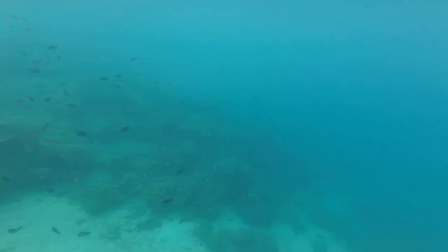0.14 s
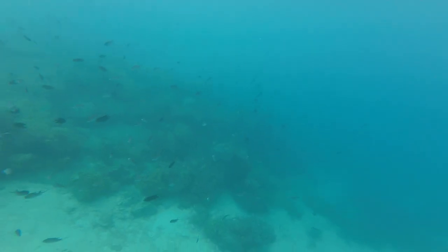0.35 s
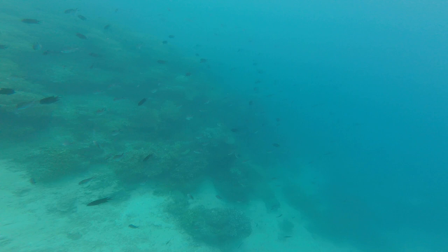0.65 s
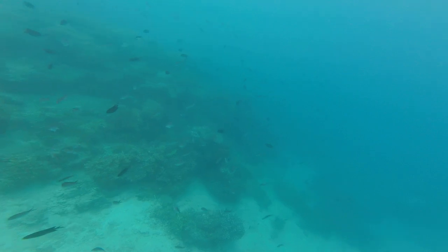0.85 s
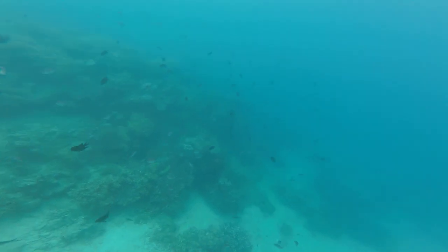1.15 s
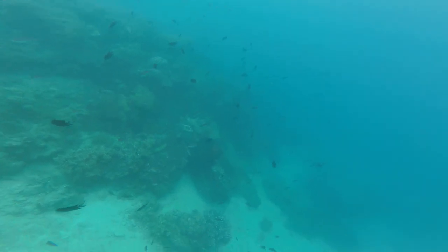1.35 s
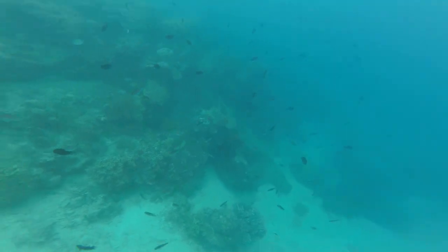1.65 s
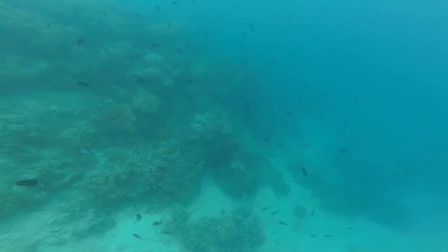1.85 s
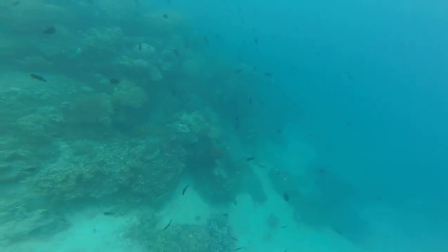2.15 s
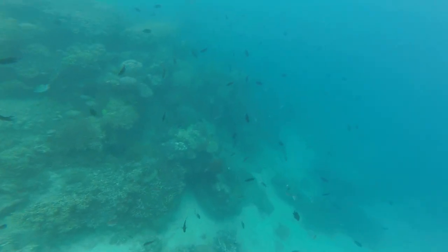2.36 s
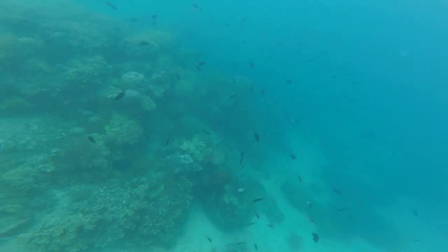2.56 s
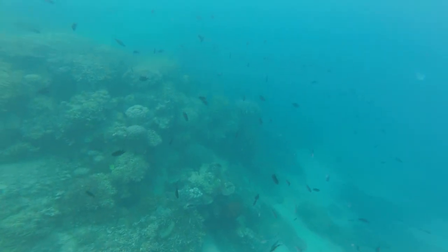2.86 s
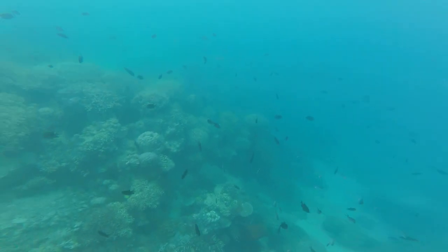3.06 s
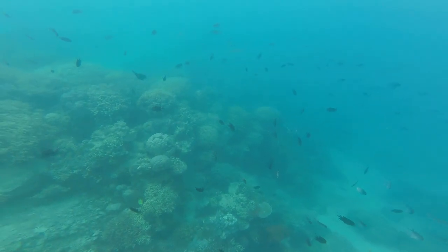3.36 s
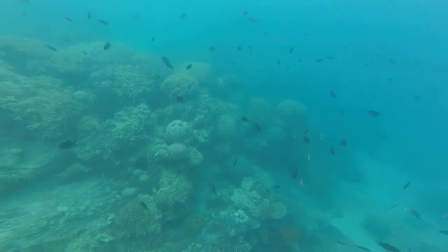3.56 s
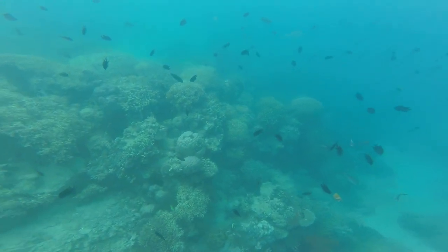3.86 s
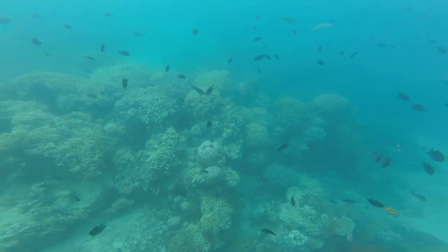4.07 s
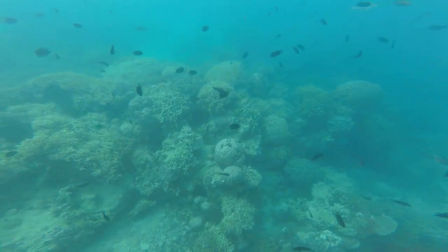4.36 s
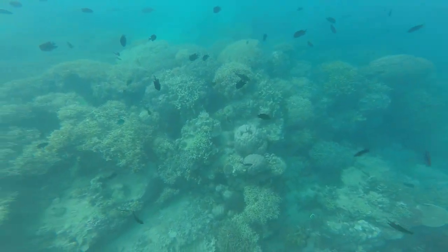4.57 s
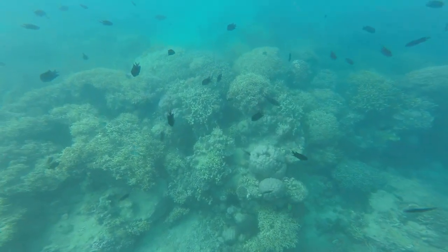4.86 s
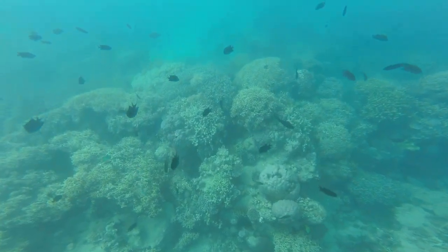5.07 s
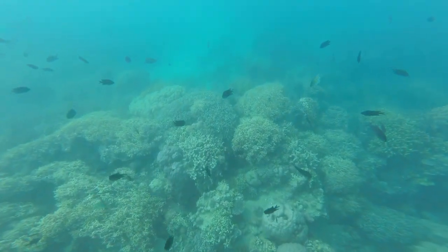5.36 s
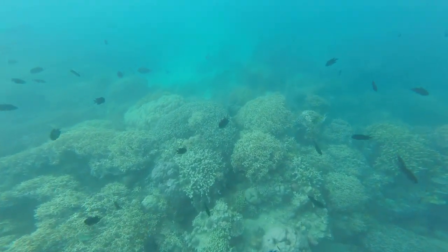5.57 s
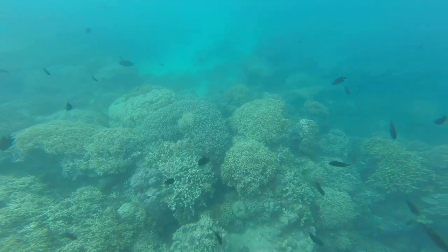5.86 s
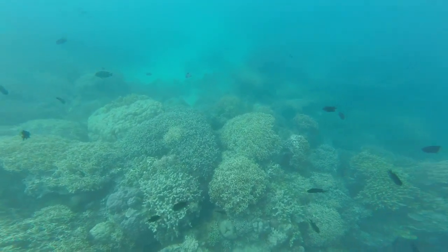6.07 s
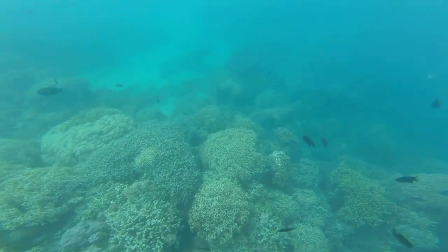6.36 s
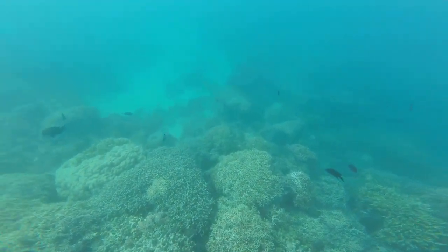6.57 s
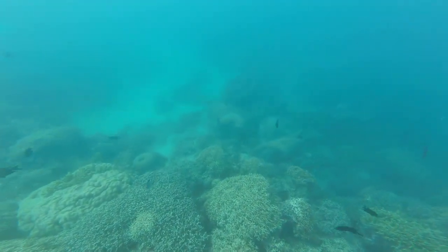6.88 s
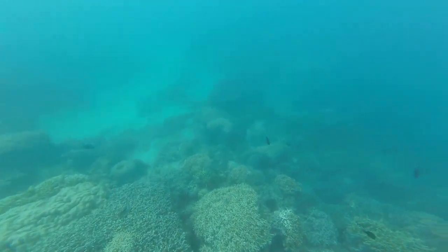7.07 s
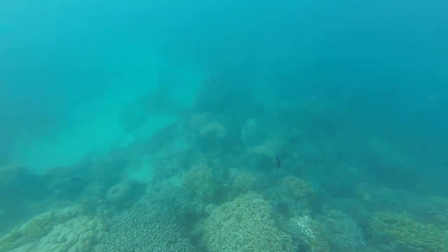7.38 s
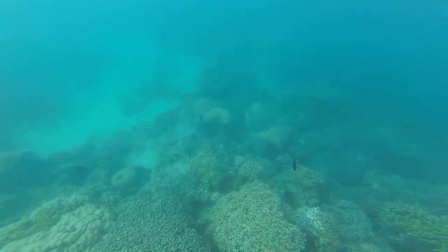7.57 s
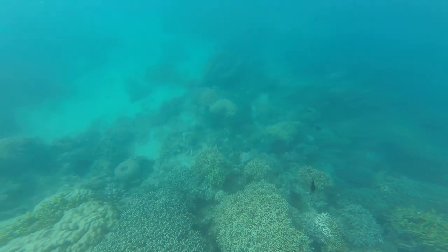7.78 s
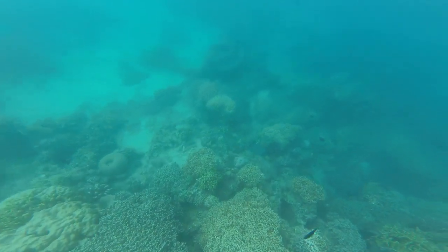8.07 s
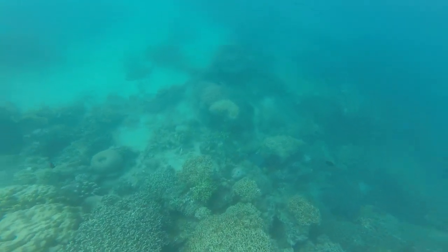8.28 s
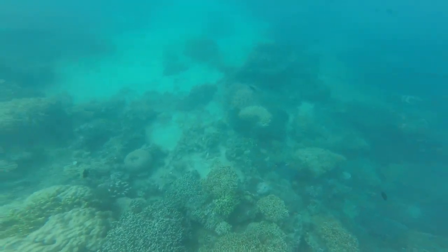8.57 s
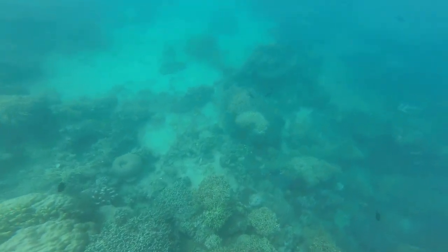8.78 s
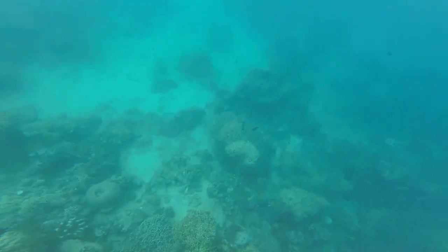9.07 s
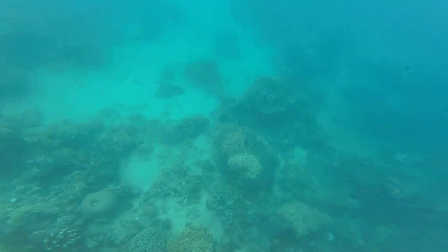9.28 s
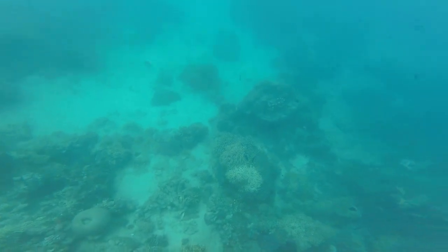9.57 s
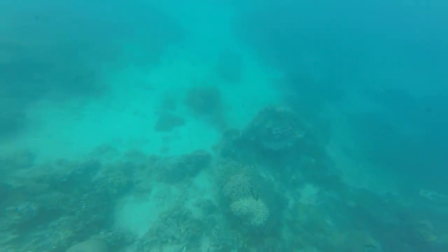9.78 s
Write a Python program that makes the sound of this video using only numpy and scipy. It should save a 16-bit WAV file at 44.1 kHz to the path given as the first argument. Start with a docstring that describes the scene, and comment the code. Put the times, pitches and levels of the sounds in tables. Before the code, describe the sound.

A muffled chugging engine, about twelve cycles a second, rattles through the sea as rushing water buffets the microphone and faint reef clicks snap.

```python
"""A boat engine runs slowly nearby, heard under water from inside a sealed housing moving over a reef.
Its hum is multiples of the cycle rate; knocks, clatter, ticks, ringing and fizz are noise bursts and
short tones, some in step with the cycle, some at random or listed times. The flow buffets the housing:
coloured noise in gusts over a rumble, with low thuds. Sharp clicks, some perhaps from snapping reef
animals, are sums of decaying tones, most ringing the housing, a few short and dry."""
import sys
import numpy as np
from scipy import signal
from scipy.fft import rfft, irfft, next_fast_len
from scipy.io import wavfile
from scipy.ndimage import uniform_filter1d, minimum_filter1d

SR = 44100
rng = np.random.default_rng(int(sys.argv[2]) if len(sys.argv) > 2 else 0)


def bounce(signal):
    """Save signal as a 16-bit WAV file at the path given by the first command-line argument."""
    frames = np.transpose(np.atleast_2d(signal))
    limited = np.clip(frames, -1, 1)
    pcm = np.round(limited * 32767).astype(np.int16)
    wavfile.write(sys.argv[1], SR, pcm)


N = 437913
T = np.arange(N) / SR

# engine at the housing, before trims: t/s, knocking level/dB, clatter level/dB, ringing level/dB
ENGINE_LEVELS = [(0.05, -31.5, -40, -54.5), (0.76, -29.5, -37, -47.5), (1.5, -25.5, -31.5, -42),
                 (1.72, -24.5, -28, -42), (1.96, -20, -28, -38), (2.5, -22.5, -31.5, -42),
                 (3.35, -21.5, -31, -41), (3.65, -23, -33.5, -43), (4.01, -22, -30, -40.5),
                 (4.36, -18.5, -26.5, -38.5), (4.61, -23, -27, -40), (5.07, -19.5, -30, -39),
                 (5.25, -26.5, -31.5, -40), (5.75, -20, -29, -38), (6.03, -25, -31, -39.5),
                 (6.33, -22, -30.5, -41), (6.98, -25, -31.5, -39.5), (7.8, -20, -35.5, -41),
                 (7.99, -36, -38.5, -41), (8.78, -28.5, -36.5, -43.5), (9.16, -36, -41.5, -48.5),
                 (9.85, -30.5, -38.5, -47.5)]
# engine fizz, also steers the faint crackle: t/s, level/dB
FIZZ_LEVELS = [(0.1, -77.5), (1.38, -64.5), (2.0, -63), (3.9, -67), (4.3, -63.5), (6.4, -63.5), (7.46, -63),
               (8.0, -64.5), (8.82, -70.5), (9.19, -78.5), (9.85, -78)]


def amp(db):
    """Amplitude ratio of a level in dB."""
    return 10 ** (np.asarray(db) / 20)


def evened(x):
    """Scale to rms 1."""
    return x / np.sqrt(np.mean(x ** 2) + 1e-20)


def curve(rows, column, t=T):
    """One column of a time table, linear between rows."""
    table = np.array(rows)
    return np.interp(t, table[:, 0], table[:, column])


def read(points, hz):
    """Spectrum level, linear in dB over log frequency, -120 dB outside the points."""
    f, db = np.transpose(points)
    return np.interp(np.log(hz + 1), np.log(f + 1), db, -120, -120)


def coloured(x, points):
    """Filter by a spectrum of f/Hz, level/dB, then scale to rms 1."""
    size = next_fast_len(N)
    gain = amp(read(points, np.fft.rfftfreq(size, 1 / SR)))
    return evened(irfft(rfft(x, size) * gain, size)[:N])


def wander(seconds):
    """Smooth chance of rms 1 that changes over the given time."""
    t = np.arange(0, N / SR + 1, seconds / 8)
    steps = rng.standard_normal(len(t))
    smooth = uniform_filter1d(uniform_filter1d(steps, 8), 8)
    return np.interp(T, t, evened(smooth))


def add(mix, s, sound):
    """Mix a sound in at s seconds, cut at the end."""
    part = mix[round(s * SR):][:len(sound)]
    part += sound[:len(part)]


def rattle(turns, blows, points, level_db, flicker_db, flicker_s):
    """Noise that bursts at fixed places of the cycle, each blow with its own strength."""
    luck = np.clip(rng.standard_normal((130, len(blows))), -2, 1.3)
    coarse = turns[::16]
    power = 1  # steady part
    for (place, length, db, scatter_db), row in zip(blows, luck.T):
        nearest = np.round(coarse - place)
        strength = amp(db + scatter_db * row[nearest.astype(int) + 2]) ** 2
        power = power + strength * np.exp(-((coarse - place - nearest) / length) ** 2)
    swell = np.interp(turns, coarse, np.sqrt(power))
    swell *= amp(flicker_db * wander(flicker_s))
    return amp(level_db) * coloured(swell * rng.standard_normal(N), points)


def bursts(rows, cycles, glide, lead_s, db, order=2):
    """Short tones that swell, die and glide, peaking after `cycles`; a higher order narrows the swell."""
    out = np.zeros(N)
    for (s, peak_db, hz), phase in zip(rows, rng.random(len(rows))):
        u = np.arange(0, 7 * cycles, hz / SR) / cycles  # 1 at the peak
        swell = (u * np.exp(1 - u)) ** order
        tone = swell * np.sin(2 * np.pi * (cycles * u * (1 + glide * (u - 1)) + phase))
        add(out, max(s - lead_s, 0), amp(peak_db + db) * tone)
    return out


def scattered(per_s, pair_hz, column, spread, over_db):
    """Random short rings near two pitches, following an engine level: t/s, level/dB, f/Hz."""
    when, size, which, detune = rng.random((int(per_s * N / SR), 4)).T
    s = when * (N / SR - .05)
    hz = np.where(which < .6, *pair_hz) * (1 + spread * (detune - .5))
    return np.transpose([s, curve(ENGINE_LEVELS, column, s) + over_db + 4.8 * size, hz])


def beneath(steady, hits, depth):
    """A struck part rings with the blow alone: its steady sound gives way while the blow lasts."""
    hit_power = uniform_filter1d(hits ** 2, 200)
    steady_power = uniform_filter1d(steady ** 2, 4000) + 1e-12
    return steady / (1 + depth * abs(hit_power / steady_power)) + hits


def engine_turns():
    """Engine cycles gone by at each sample; the slope is the cycle rate."""
    # t/s, cycles gone by
    cycle_times = [(0, -0.52), (0.8766, 10), (1.7037, 20), (2.5441, 30), (3.3828, 40), (3.7944, 45),
                   (4.6056, 55), (5.4367, 65), (6.2633, 75), (6.6742, 80), (7.5134, 90), (8.339, 100),
                   (9.1383, 110), (9.94, 120.13)]
    return curve(cycle_times, 1)


def hum(turns):
    """Low multiples of the cycle rate, in step with one pressure pulse a cycle, each wavering a little."""
    # multiple of the cycle rate, relative level/dB
    partials = [(2, -13), (3, -9), (4, 0), (5, -13), (6, -16), (7, -13)]
    # t/s, level/dB
    levels = [(0.1, -30.5), (0.37, -56), (1.19, -28), (1.4, -40), (1.87, -22.5), (3.4, -23), (3.6, -28),
              (4.38, -28), (5.94, -25.5), (6.1, -29), (7.06, -24.5), (7.71, -23.5), (8.21, -37),
              (9.15, -25.5), (9.41, -43), (9.9, -22)]
    drift_cycles = 0.035 * wander(0.22)  # the path through the water shifts
    tones = np.zeros(N)
    for k, db in partials:
        waver_db = 1.5 * wander(.25)
        tones += amp(db + waver_db) * np.cos(2 * np.pi * k * (turns - .1 + drift_cycles))
    return amp(curve(levels, 1)) * np.sqrt(2) * tones


def knocking(turns):
    """Mid-pitched noise blows in each cycle and random soft knocks, giving way to the loudest knocks."""
    # place in cycle (0-1), length/cycles, level over steady/dB, scatter/dB
    blows = [(0.079, 0.09, 7, 1.8), (0.279, 0.06, 5, 1.8), (0.621, 0.04, 0, 1.8), (.85, 0.08, 6.5, 1.8)]
    # f/Hz, relative density/dB per Hz
    spectrum = [(330, -19.5), (450, -4), (560, -3), (640, 2), (800, -0.5), (900, -1.5), (990, -6.5),
                (1100, -10.5), (1400, -43)]
    # loudest knocks: t/s (starts lead_s earlier), relative peak/dB, f/Hz
    thumps = [(.033, -19.5, 880), (.04, -21.5, 536), (.055, -19, 900), (.184, -22.5, 430),
              (0.485, -19.5, 462), (.532, -22, 820), (.717, -18.5, 774), (0.972, -22, 785),
              (1.047, -21, 665), (1.09, -16.5, 784), (1.18, -17, 745), (1.412, -17, 790),
              (1.592, -13.5, 750), (1.703, -19, 800), (1.749, -13.5, 704), (1.79, -13, 770),
              (1.822, -12, 810), (1.876, -19, 620), (1.927, -18, 676), (1.98, -10, 940), (2.013, -18, 780),
              (2.035, -19, 810), (2.056, -22, 715), (2.085, -14, 740), (2.178, -9, 617), (2.362, -10, 776),
              (2.422, -22, 608), (2.52, -14, 690), (2.693, -15, 780), (2.929, -17, 656), (2.946, -8.5, 730),
              (2.984, -10.5, 890), (3.025, -12, 830), (3.054, -10.5, 687), (3.08, -16, 750),
              (3.111, -16, 750), (3.14, -16, 850), (3.217, -21, 623), (3.287, -10.5, 845),
              (3.322, -15, 740), (3.371, -12, 830), (3.452, -13, 790), (3.531, -10.5, 740),
              (3.698, -16, 780), (3.782, -14, 790), (3.816, -12, 770), (3.862, -11, 710), (3.9, -11, 760),
              (3.943, -15, 770), (3.976, -8.5, 700), (4.022, -12, 736), (4.062, -12, 750),
              (4.123, -13, 700), (4.146, -12, 786), (4.187, -12, 790), (4.217, -20, 700),
              (4.268, -9.5, 705), (4.285, -13, 683), (4.302, -8, 690), (4.312, -13, 527),
              (4.348, -5.5, 686), (4.385, -19, 774), (4.415, -19, 770), (4.425, -17, 785), (4.436, -9, 727),
              (4.447, -12, 690), (4.462, -19, 835), (4.508, -5.5, 693), (4.536, -11, 740), (4.58, -14, 700),
              (4.617, -9.5, 415), (4.667, -18, 810), (4.691, -22, 810), (4.759, -14, 830),
              (4.796, -15, 770), (4.839, -9.5, 786), (4.875, -6, 720), (4.921, -11.5, 780),
              (4.953, -8.5, 764), (5.003, -9.5, 747), (5.085, -13, 552), (5.119, -7, 710), (5.27, -19, 573),
              (5.326, -21, 613), (5.418, -13.5, 770), (5.49, -10, 790), (5.583, -9.5, 667),
              (5.651, -11, 610), (5.671, -8.5, 766), (5.741, -8.5, 603), (5.752, -14, 794),
              (5.857, -11, 770), (5.911, -13.5, 607), (6.083, -8.5, 770), (6.147, -19, 900),
              (6.167, -12, 588), (6.204, -12, 840), (6.232, -15, 786), (6.248, -11, 696),
              (6.334, -12.5, 796), (6.365, -16, 656), (6.401, -10, 740), (6.494, -9, 745),
              (6.565, -13, 620), (6.721, -10.5, 608), (6.757, -13, 740), (6.929, -24, 600),
              (7.182, -22, 880), (7.41, -13.5, 650), (7.433, -17, 646), (7.493, -6, 617), (7.52, -15, 687),
              (7.564, -19, 664), (7.579, -9.5, 614), (7.596, -7, 663), (7.658, -9.5, 640),
              (7.72, -13.5, 426), (7.74, -10.5, 670), (7.762, -8.5, 700), (7.778, -12.5, 770),
              (8.057, -13.5, 794), (8.164, -19, 560), (8.296, -14, 640), (8.427, -18, 580),
              (8.636, -20, 595), (8.706, -21, 776), (8.778, -23, 567), (8.945, -25, 703),
              (9.227, -18.5, 921), (9.325, -20, 846), (9.43, -24, 830), (9.654, -18, 710),
              (9.855, -22, 760)]
    level_db = curve(ENGINE_LEVELS, 1) - 4.0
    steady = rattle(turns, blows, spectrum, level_db, flicker_db=0.56, flicker_s=0.0073)
    soft_rows = scattered(per_s=45, pair_hz=[770, 632], column=1, spread=0.45, over_db=-4.0)
    soft = bursts(soft_rows, cycles=3.36, glide=0.03, lead_s=0, db=0.5)
    loud = bursts(thumps, cycles=3.72, glide=0.054, lead_s=0.00422, db=-2.0, order=5)
    return beneath(steady + soft, loud, depth=0.87)


def clattering(turns):
    """Noise blows in each cycle and small parts ringing at random, giving way to the loudest pings."""
    # place in cycle (0-1), length/cycles, level over steady/dB, scatter/dB
    blows = [(.03, 0.063, 2.4, 4.7), (0.549, 0.051, 1.2, 5.6), (0.849, 0.22, 1.9, 2.1)]
    # f/Hz, relative density/dB per Hz
    spectrum = [(620, -39), (1050, 1), (1180, -5), (1420, 0), (1490, 0), (1600, -5.5), (1770, 1),
                (1960, -11), (2200, -14), (2860, -36), (4840, -120)]
    # loudest pings: t/s (starts lead_s earlier), relative peak/dB, f/Hz
    pops = [(.0997, -15, 1520), (.1242, -17, 1570), (.207, -17, 1710), (.2828, -13.5, 1500),
            (.3287, -27, 1520), (.3726, -17, 1540), (0.4589, -11, 1480), (.5083, -14, 1500),
            (0.588, -11, 1500), (0.622, -12, 1520), (.6634, -17, 1980), (0.6784, -6.5, 1430),
            (0.709, -9, 1520), (0.7911, -10.5, 1560), (0.8809, -8, 1480), (0.9063, -12, 1490),
            (.9613, -18, 1620), (1.015, -9.5, 1480), (1.04, -8, 1760), (1.0725, -13, 1500),
            (1.13, -11.5, 1570), (1.1713, -15, 1800), (1.2441, -18, 1580), (1.2845, -13, 1820),
            (1.545, -6, 1520), (1.623, -10, 1450), (1.651, -10, 1520), (1.708, -9, 1890), (1.776, -7, 2060),
            (1.795, -16, 1650), (1.8761, -4, 1660), (1.91, -13, 1480), (1.943, -4, 1750),
            (1.9824, -6, 1500), (2.04, -8, 1830), (2.077, -13, 1433), (2.105, -13, 1792), (2.164, -5, 1500),
            (2.395, -9, 2000), (2.444, -10, 1760), (2.4458, -1, 1460), (2.453, -5, 1530), (2.467, -7, 1520),
            (2.63, -6, 1500), (2.6673, -2, 1420), (2.669, -5, 1830), (2.675, -9, 1500), (2.802, -20, 1410),
            (2.9203, -10, 1450), (2.947, -5, 1440), (3.1966, -7.5, 1400), (3.27, -5, 1410),
            (3.3802, -6, 1430), (3.433, -9, 1370), (3.667, -8, 1370), (3.92, -5, 1390),
            (4.0008, -6.5, 1350), (4.076, -6, 1360), (4.204, -11, 1433), (4.238, -7, 1300),
            (4.422, -6, 1350), (4.447, -7, 1720), (4.485, -8, 1340), (4.567, -4, 1380), (4.769, -7, 1730),
            (4.79, -14, 1488), (4.795, -6, 1740), (4.9227, -4.5, 1730), (5.226, -9, 1800),
            (5.3547, -5, 1410), (5.423, -6, 1770), (5.43, -5.5, 1340), (5.669, -10, 1709),
            (5.748, -6, 1390), (6.034, -7, 1800), (6.1404, -6, 1390), (6.338, -10, 1420),
            (6.389, -11, 1370), (6.412, -6, 1440), (6.807, -8, 1510), (6.9062, -7, 1660),
            (7.149, -11, 1470), (7.174, -7, 1510), (7.303, -7, 1480), (7.325, -5, 1480), (7.45, -4.5, 1460),
            (7.5078, -10, 1830), (8.0805, -15, 1560), (8.1972, -12, 1600), (8.2546, -10, 1530),
            (8.3459, -10, 1530), (8.7091, -14, 1460), (8.8094, -13, 2140), (9.1473, -22, 2000),
            (9.2509, -15, 1840), (9.3247, -11, 1780), (9.4117, -19, 1870), (9.5614, -17, 1950),
            (9.61, -16.5, 1410), (9.6871, -18, 1470), (9.7647, -11, 1450), (9.8223, -20, 1510),
            (9.8697, -20, 1830)]
    level_db = curve(ENGINE_LEVELS, 2) - 1.6
    steady = rattle(turns, blows, spectrum, level_db, flicker_db=0.5, flicker_s=0.0075)
    ping_rows = scattered(per_s=190, pair_hz=[1445.5, 1760], column=2, spread=0.21, over_db=-6.0)
    pings = bursts(ping_rows, cycles=6.3, glide=0.0094, lead_s=0, db=0.5)
    loud = bursts(pops, cycles=5.7, glide=0.0051, lead_s=0.0026, db=-13.0, order=3)
    return beneath(steady + pings, loud, depth=0.38)


def ticks(turns):
    """Valve ticks: a short metal ring at the same places of every cycle."""
    # place in cycle, level over the ringing/dB
    places = [(-.02, 18), (0.499, -5.5), (.88, 0.5)]
    t, t60_s = np.arange(1200) / SR, 0.0076
    ring = np.zeros(len(t))
    for hz, db in [(2600, -1.0), (3280, -6.0)]:
        ring += np.sin(2 * np.pi * hz * t) * amp(db - 60 * t / t60_s)
    ring *= (1 - np.exp(-t / 0.00093)) ** 2  # the housing softens the start
    strikes = np.zeros(N)
    for place, db in places:
        at = np.flatnonzero(np.diff(np.floor(turns - place)))
        strikes[at] += amp(db + 2.5 * rng.standard_normal(len(at)))
    return signal.oaconvolve(strikes * amp(curve(ENGINE_LEVELS, 3)), ring)[:N]


def ringing(turns):
    """Ringing band of noise, swelling with blows in each cycle."""
    # place in cycle (0-1), length/cycles, level over steady/dB, scatter/dB
    blows = [(.15, 0.067, 3.5, 2), (0.529, 0.016, 3.2, 2.7), (.87, 0.08, 3.2, 0.86)]
    # f/Hz, relative density/dB per Hz
    spectrum = [(1210, -17.5), (2050, 0), (2540, -5.5), (2850, -17), (3260, -17.5), (3560, -24.5),
                (3800, -40.5), (4500, -68.5), (7170, -120)]
    level_db = curve(ENGINE_LEVELS, 3) + 1.86
    return rattle(turns, blows, spectrum, level_db, flicker_db=2.0, flicker_s=0.003)


def fizzing(turns):
    """Faint treble noise, swelling with brief blows in each cycle."""
    # place in cycle (0-1), length/cycles, level over steady/dB, scatter/dB
    blows = [(.02, 0.024, 1.5, 3), (.52, 0.026, 1.9, 1.8), (.82, 0.046, 1.8, 3.4)]
    # f/Hz, relative density/dB per Hz
    spectrum = [(3300, -41.5), (3700, -6), (5000, -6.5), (5900, -8.5), (6250, -7), (6470, 3.5),
                (6800, -3.5), (7500, -5.5), (9300, -15), (10100, -29), (12000, -31), (13000, -63.5)]
    return rattle(turns, blows, spectrum, curve(FIZZ_LEVELS, 1), flicker_db=1.0, flicker_s=0.0086)


def gusts():
    """Flow rows t/s, level/dB, brightness/dB per octave: each gust rises quickly, holds and fades."""
    # flow between gusts: t/s, level/dB
    calm = [(0.1, -32.5), (0.5, -29.5), (0.75, -35), (1.3, -28), (2.4, -27), (3.9, -31.5), (4.4, -25.5),
            (5.8, -29.5), (7.3, -30.5), (7.8, -25), (9.9, -25)]
    # start/s, hold/s, level/dB, brightness/dB per octave
    gust_rows = [(0.015, 0.022, -30.5, 4), (1.627, 0.15, -27, -5.5), (1.992, 0.068, -21, 0),
                 (2.133, 0.045, -24.5, 10.5), (2.644, 0.2, -21, 0.5), (2.984, 0.048, -23, 2.5),
                 (3.414, 0.046, -21.5, 2.5), (3.574, 0.039, -25.5, -5), (4.09, 0.014, -29.5, 6),
                 (4.597, 0.019, -24.5, 0.5), (5.13, 0.27, -19.5, 0.5), (5.928, 0.13, -20, 0.5),
                 (6.126, 0.042, -21, 4.5), (6.302, 0.19, -19.5, -1), (6.785, 0.22, -25, -0.5),
                 (7.533, 0.057, -32.5, 2), (7.861, 0.14, -18, 0.5), (7.997, 0.41, -17.5, 2.4),
                 (8.496, 0.34, -20, -2), (8.87, 0.36, -18.5, -1), (9.361, 0.047, -24.5, -4.5),
                 (9.493, .02, -24.5, -10), (9.606, .03, -26, -11.5), (9.766, .04, -21, -4)]
    rise_s, fade_db_per_s = 0.0074, 84.5
    t = np.arange(0, N / SR, .002)
    power = amp(curve(calm, 1, t)) ** 2
    tilt = 0  # weighted by power
    for s, hold_s, db, tilt_db in gust_rows:
        fade_db = fade_db_per_s * np.maximum(t - s - rise_s - hold_s, 0)
        gust = (np.clip((t - s) / rise_s, 0, 1) * amp(db - fade_db)) ** 2
        power = power + gust
        tilt = tilt + gust * tilt_db
    return np.transpose([t, 10 * np.log10(power), tilt / power])


def flow():
    """Lumpy turbulence in gusts, each with its own brightness, over a deep rumble."""
    # buffeting: f/Hz, relative density/dB per Hz
    buffet = [(53, -31), (90, 0), (146, 1.5), (322, -3), (629, -11), (688, -17.5), (786, -10.5), (909, -20),
              (1300, -29.5), (1690, -61), (2860, -120)]
    # deep push of the water: t/s, level/dB before its waver
    rumble_levels = [(0.1, -30.5), (1.3, -23), (1.7, -22), (2.25, -31), (2.79, -21), (3.1, -22.5),
                     (3.49, -22.5), (3.9, -27.5), (4.7, -24), (5.3, -29), (5.45, -20), (5.65, -28),
                     (5.85, -25), (6.7, -27), (7.1, -26), (7.67, -23.5), (8.65, -18.5), (8.8, -25),
                     (9.03, -19), (9.3, -27.5), (9.85, -29)]
    # f/Hz, relative density/dB per Hz
    rumble_spectrum = [(10, -36), (24, -3), (40, -5), (70, -4), (100, -9), (140, -15.5), (300, -84)]
    hop, frames = 256, N // 256 + 5
    hz = np.fft.rfftfreq(1024, 1 / SR)
    real, imag, patches = rng.standard_normal((frames, 513, 3)).T
    # patches of strength, smooth over 8 bins and 6 frames
    patches = evened(uniform_filter1d(uniform_filter1d(patches, 8, 0), 6, 1))
    push = gusts()
    octaves = np.log2(np.maximum(hz, 20) / 220)[:, None]
    tilt_db = np.clip(curve(push, 2, np.arange(frames) * hop / SR) * octaves, -30, 12)
    grid = (real + 1j * imag) * amp(1.13 * patches + tilt_db)
    lumps = signal.istft(grid, nperseg=1024, noverlap=1024 - hop)[1][:N]
    lumps = lumps * amp(1.5 * wander(.015))
    rumble_db = curve(rumble_levels, 1) + 1.5 * wander(.1)
    rumble = amp(rumble_db) * coloured(rng.standard_normal(N), rumble_spectrum)
    return amp(curve(push, 1)) * coloured(lumps, buffet) + rumble


def water():
    """The flow, giving way to the loudest lumps of water hitting the housing."""
    # t/s (starts lead_s earlier), relative peak/dB, f/Hz
    thuds = [(.072, -11, 187), (.23, -15.5, 109), (.36, -16, 109), (.425, -16, 216), (1.677, -10.5, 164),
             (1.824, -11, 161), (2.013, -12, 150), (2.165, -7, 186), (2.257, -6, 224), (2.672, -11.5, 117),
             (2.71, -8, 265), (2.736, -8, 140), (3.486, -8, 87), (3.53, -6.5, 91), (4.612, -12, 290),
             (5.178, -8, 207), (5.381, -10, 114), (5.972, -10, 92), (6.142, -10, 327), (6.328, -5.5, 173),
             (6.364, -10, 166), (6.903, -6, 209), (7.881, -9.5, 127), (8.092, -7, 173), (8.513, -4.5, 115),
             (8.622, -17, 91), (8.668, -7.5, 192), (8.712, -8, 125), (8.86, -16, 90), (8.92, -2.5, 151),
             (9.012, -6, 88.5), (9.075, -14, 88), (9.143, -9, 90)]
    hits = bursts(thuds, cycles=1.05, glide=0.011, lead_s=0.01076, db=-5.0)
    return beneath(flow(), hits, depth=0.4)


def click_rings(modes, detune):
    """Decaying tones of a click, one per mode."""
    t = np.arange(800) / SR
    onset = (1 - np.exp(-t / 0.00009)) ** 2
    return [amp(db - 60 * t / t60_s) * np.sin(2 * np.pi * hz * d * t) * onset
            for (hz, db, t60_s), d in zip(modes, detune)]


def sharp_clicks():
    """Sharp clicks, most ringing the housing, a few short and dry, over a faint crackle in ten colours."""
    # click resonances: f/Hz, relative level/dB, t60/s
    modes = [(4050, 5, 0.0011), (6560, 0.5, 0.0064), (7800, -3, 0.0046), (10600, -24.5, .001)]
    # loudest clicks: t/s (starts 0.8 ms later), relative level/dB,
    # relative weight of lowest ring/dB, weight of two highest rings/dB
    loudest = [(.2011, -56, -17, -12), (.3797, -55, -15, -11), (.6341, -55, -14, -7),
               (.9928, -52, -17, -14), (1.4467, -46, -14, -15), (1.6498, -48, -16, -21),
               (1.8329, -48, -14, -12), (1.8509, -48, -11, -16), (2.1377, -45, -22, -15),
               (2.1906, -46, -21, -19), (2.4425, -50, -12, -12), (2.5323, -47, -19, -18),
               (2.679, -42, -28, -2), (2.8481, -40.5, -13, -8), (2.887, -53, -11, -4),
               (3.5335, -47, -17, -14), (3.6752, -54, -17, -11), (3.9431, -49, -20, -18),
               (4.0394, -46, -20, -21), (4.0578, -47, -15, -16), (4.139, -50, -15, -19),
               (4.2983, -48, -19, -5), (4.3746, -47, -21, -10), (4.4723, -42, -10, -13),
               (4.632, -53, -19, -18), (4.7438, -51, -18, -9), (4.7562, -45, -22, -19),
               (5.2406, -46, -23, -16), (5.5834, -52, -14, -17), (5.8084, -48, -20, -16),
               (5.9115, -42, -22, -1), (6.3277, -54, -7, -11), (6.389, -40, -26, -12),
               (6.4928, -53, -12, -12), (6.5976, -41, -23, -15), (6.826, -31.5, -18, -12),
               (7.6143, -49, -15, -18), (7.8442, -58, -20, -15), (8.2408, -46, -14, -12),
               (8.2555, -42, -23, -15), (8.313, -39, -13, -16), (8.6324, -46, -15, -8),
               (8.6714, -50, -10, -15), (8.9931, -55, -11, -15), (9.0876, -54, -4, -4), (9.096, -48, -1, 3),
               (9.1473, -58, -9, -10), (9.1523, -58, -8, -12)]
    crackle_per_s, crackle_db = 90, -69
    size_db = crackle_db + 3.5 * np.minimum(rng.exponential(1, N), 4)
    size = amp(size_db) * (rng.random(N) < crackle_per_s / SR)
    size *= amp(.6 * (curve(FIZZ_LEVELS, 1) + 65.5))  # the crackle follows the fizz level
    kind, out = rng.integers(0, 10, N), np.zeros(N)
    for k, luck in enumerate(rng.standard_normal((10, 7))):
        detune = 1 + np.array([.15, .02, .08, 0]) * luck[3:]
        click = amp(4.0 * luck[:3] + [-8, 0, 0]) @ click_rings(modes, detune)[:3]
        out += signal.oaconvolve(size * (kind == k), click)[:N]
    for (s, db, low_db, high_db), luck in zip(loudest, rng.standard_normal((len(loudest), 4))):
        low, main, high, top = click_rings(modes, 1 + 0.023 * luck)
        click = amp(low_db + 20.0) * low + main + amp(high_db) * (high + top)
        add(out, s + .0008, amp(db + 4.5) * click)
    return out


def cracks():
    """Short cracks, low to high in pitch: tones of a few cycles that glide down slightly."""
    # t/s (starts lead_s earlier), relative peak/dB, f/Hz
    rows = [(0.2563, -32, 2450), (0.5277, -31, 2460), (1.4706, -27, 2570), (1.7714, -19.5, 2520),
            (1.8158, -23, 2270), (1.876, -24, 1230), (1.9435, -21, 1280), (2.3625, -26, 1240),
            (2.8494, -43, 2470), (4.2602, -32, 2530), (4.4725, -40, 3300), (6.8259, -27, 2560),
            (8.2546, -32, 3000), (8.312, -22, 2100)]
    return bursts(rows, cycles=2.8, glide=-0.028, lead_s=0.00032, db=3.0)


def scene():
    """Engine, water, clicks and cracks in one channel."""
    turns = engine_turns()
    sway = amp(0.53 * wander(.1) + 0.68 * wander(.015))  # metal noises waver together as the housing sways
    metal = knocking(turns) + clattering(turns) + ticks(turns) + ringing(turns) + fizzing(turns)
    engine = hum(turns) + sway * metal
    return (engine + water() + sharp_clicks() + cracks())[None]


def record(dry):
    """A limiter turns down the highest peaks; then a low-pass limits the band."""
    limit_db, edge_hz = -4.3, 12900
    room = np.minimum(amp(limit_db) / (abs(dry) + 1e-9), 1)
    gain = uniform_filter1d(uniform_filter1d(minimum_filter1d(room, 400), 200), 200)
    padded = np.pad(dry * gain, ((0, 0), (255, 255)), "reflect", reflect_type="odd")
    lowpass = signal.firwin(511, edge_hz, window=("kaiser", 9), fs=SR)
    return signal.oaconvolve(padded, lowpass[None], "valid")


dry = scene()
out = record(dry)
bounce(out)
```